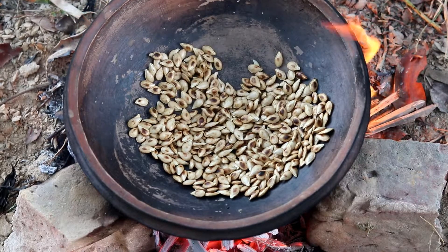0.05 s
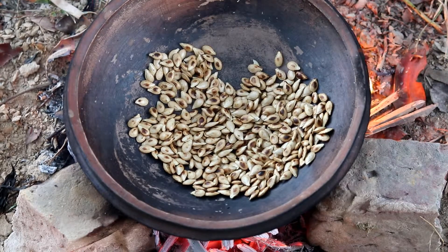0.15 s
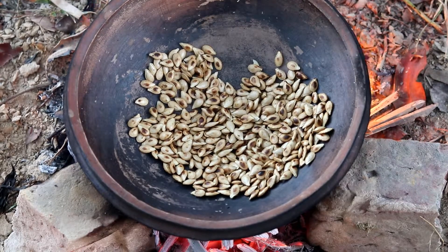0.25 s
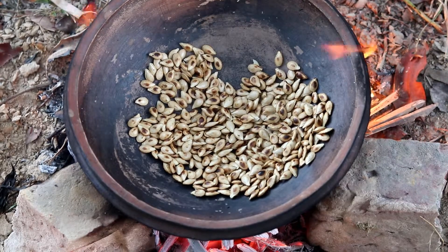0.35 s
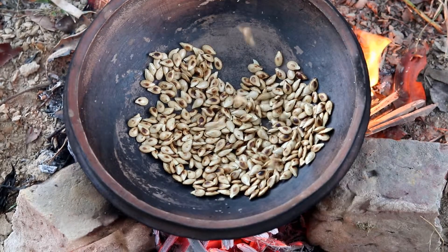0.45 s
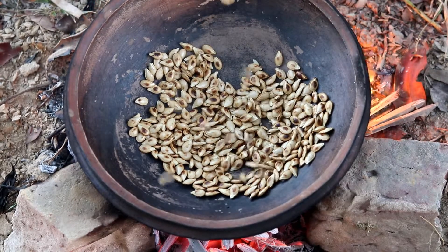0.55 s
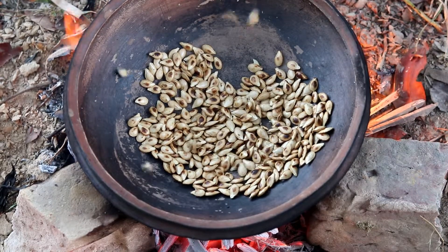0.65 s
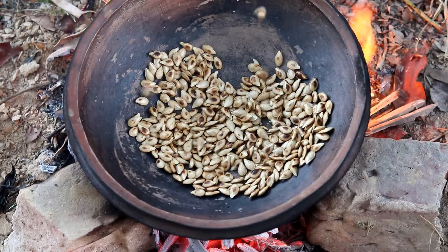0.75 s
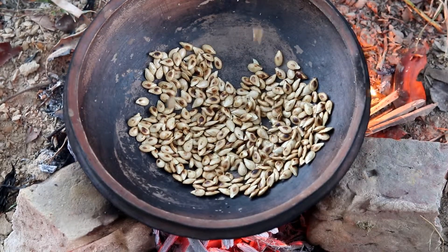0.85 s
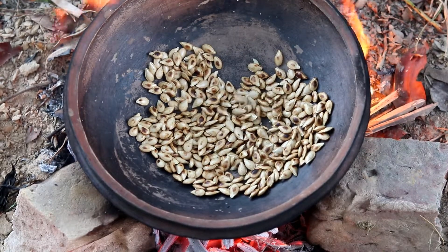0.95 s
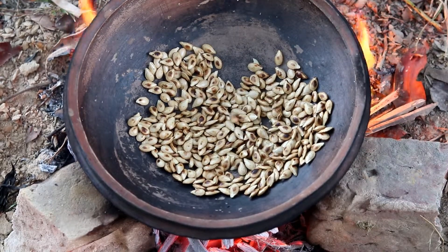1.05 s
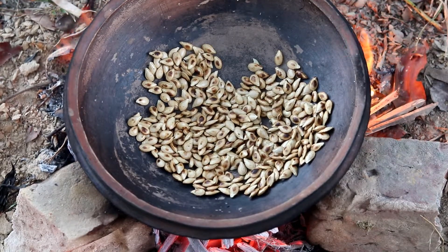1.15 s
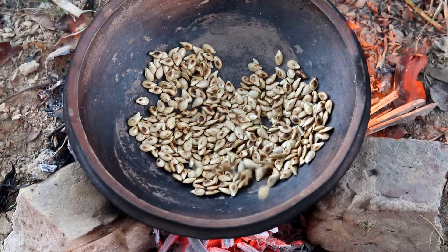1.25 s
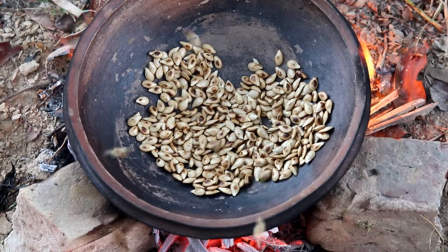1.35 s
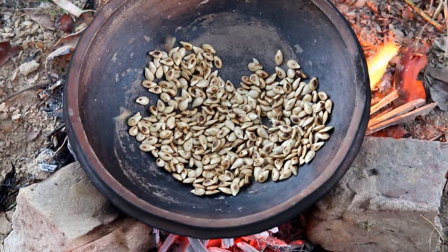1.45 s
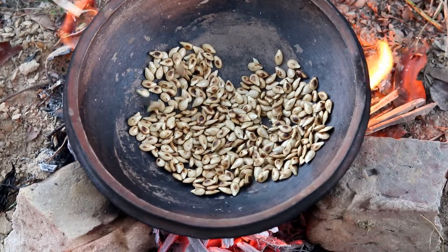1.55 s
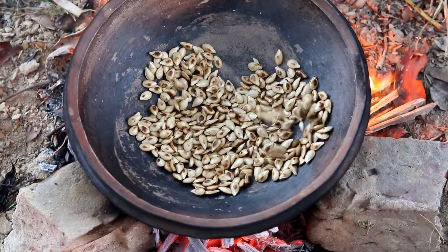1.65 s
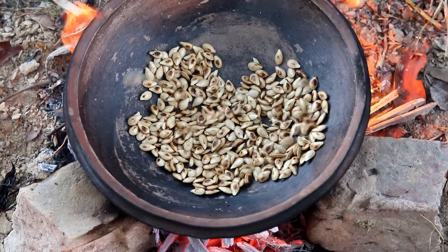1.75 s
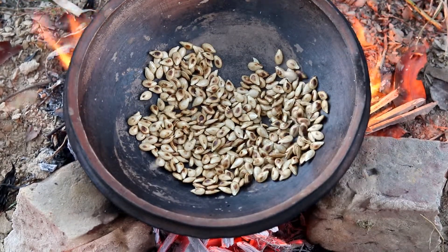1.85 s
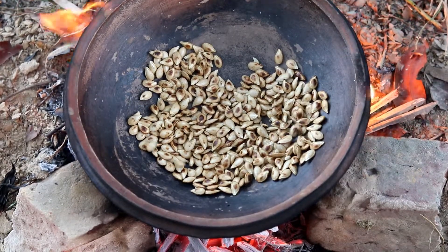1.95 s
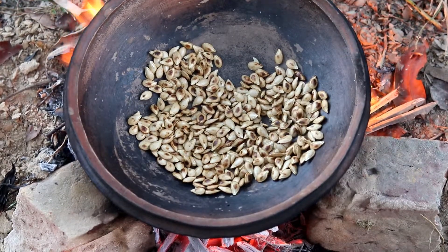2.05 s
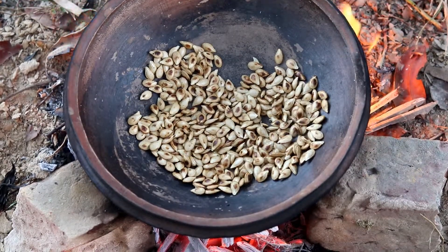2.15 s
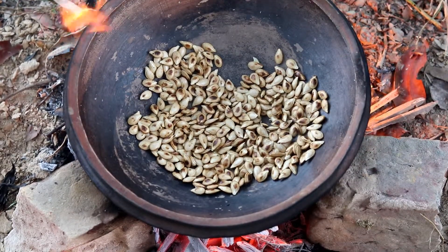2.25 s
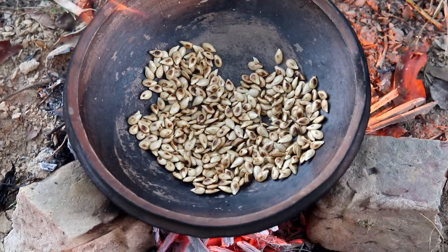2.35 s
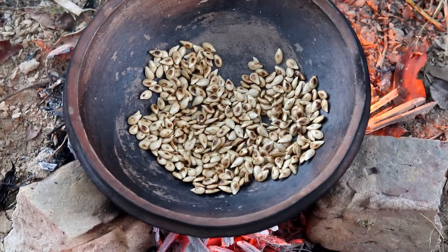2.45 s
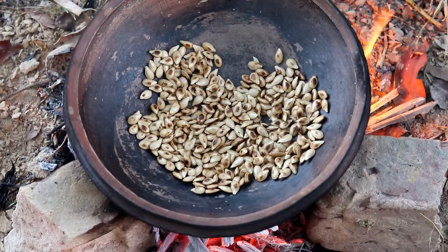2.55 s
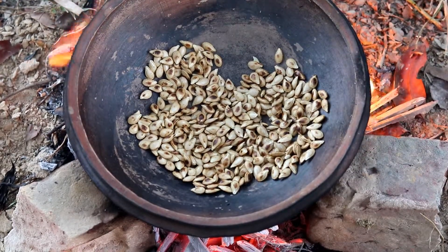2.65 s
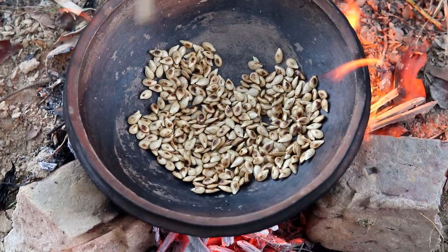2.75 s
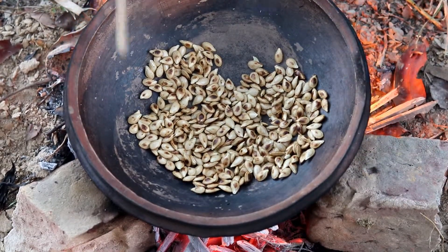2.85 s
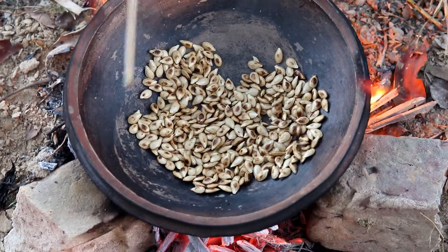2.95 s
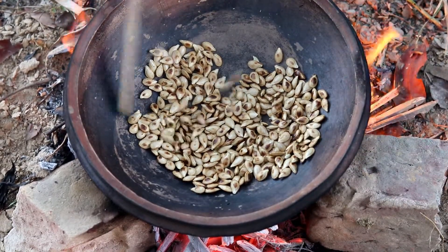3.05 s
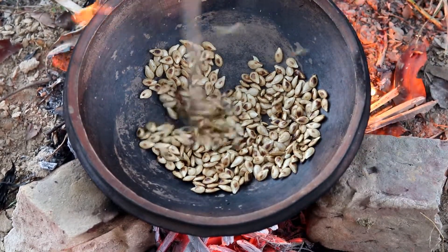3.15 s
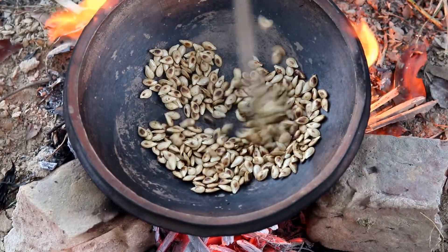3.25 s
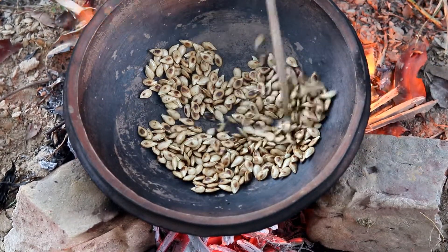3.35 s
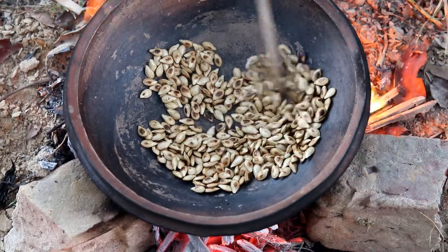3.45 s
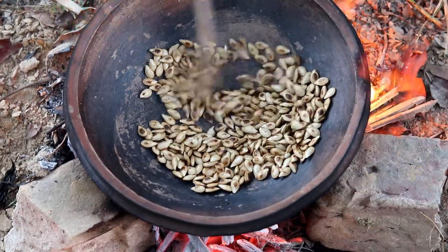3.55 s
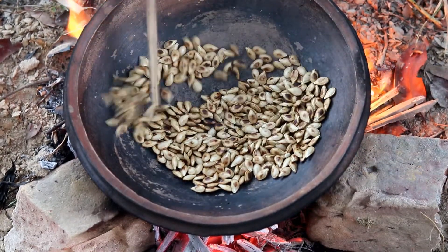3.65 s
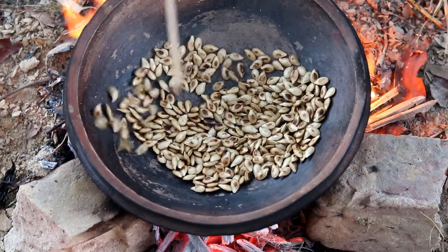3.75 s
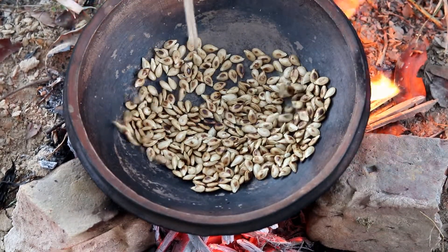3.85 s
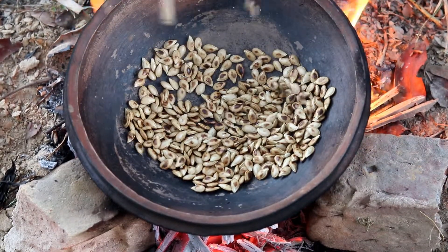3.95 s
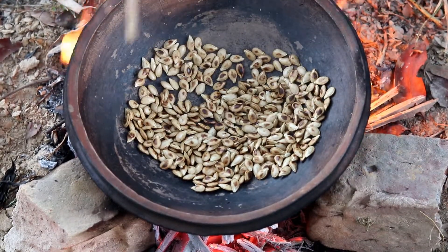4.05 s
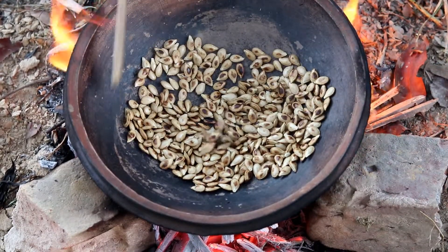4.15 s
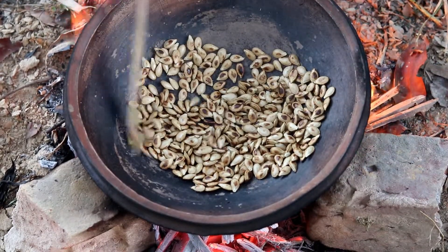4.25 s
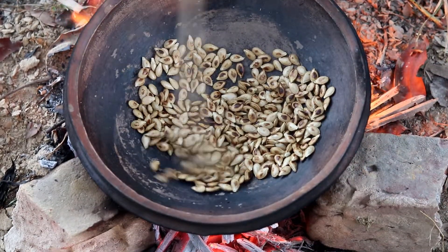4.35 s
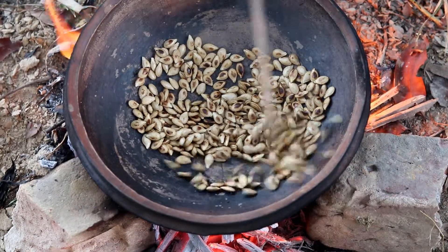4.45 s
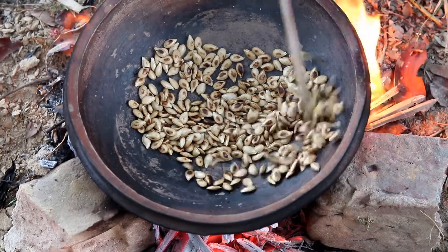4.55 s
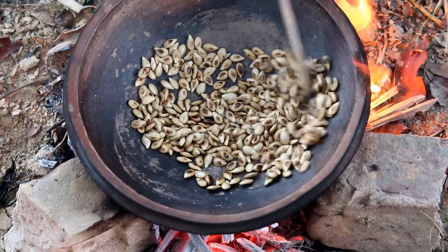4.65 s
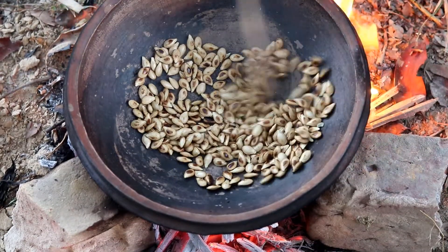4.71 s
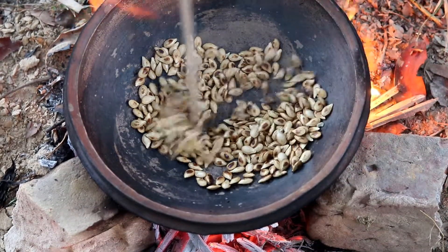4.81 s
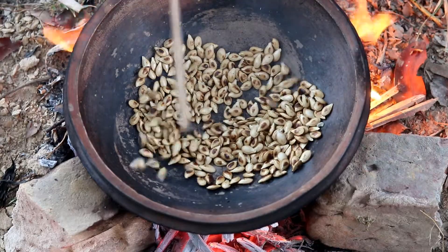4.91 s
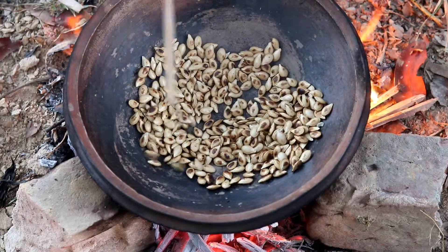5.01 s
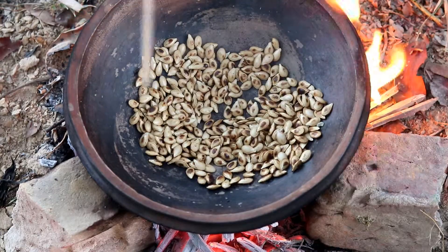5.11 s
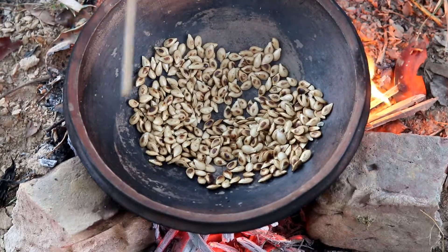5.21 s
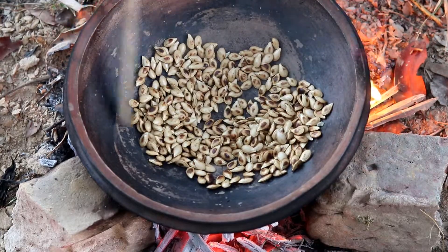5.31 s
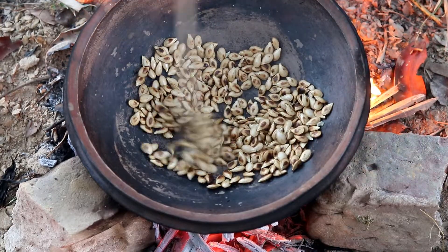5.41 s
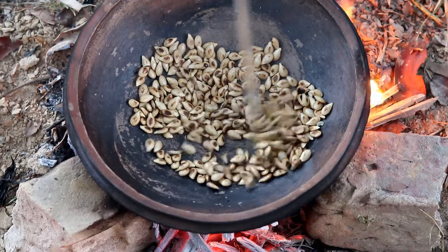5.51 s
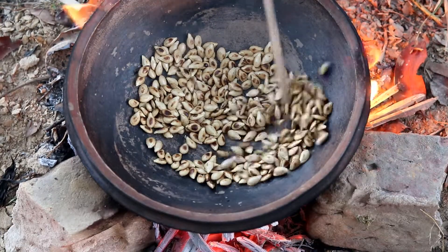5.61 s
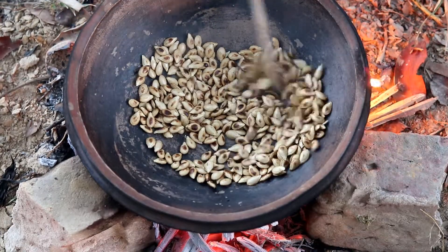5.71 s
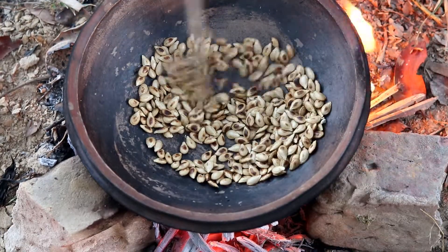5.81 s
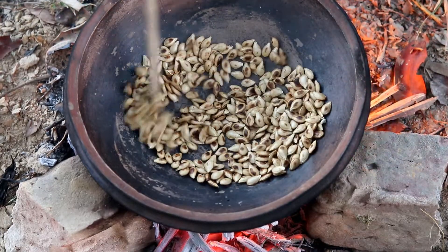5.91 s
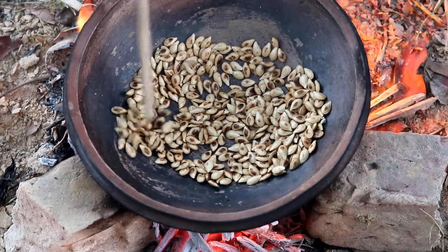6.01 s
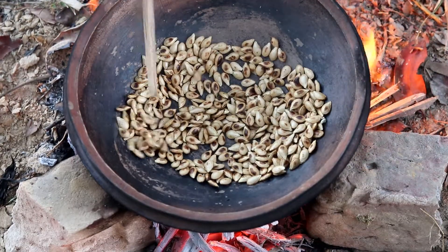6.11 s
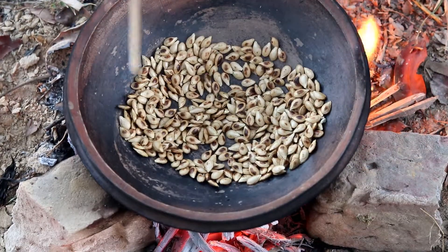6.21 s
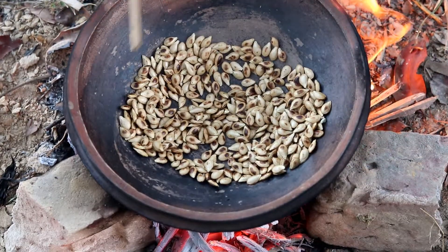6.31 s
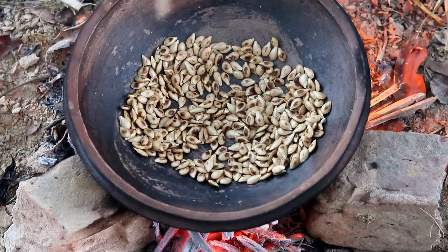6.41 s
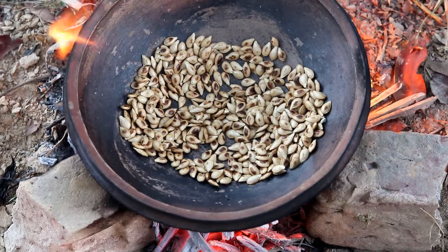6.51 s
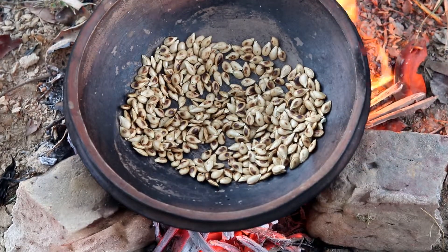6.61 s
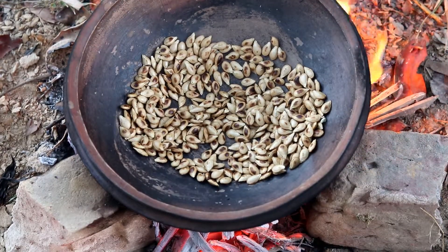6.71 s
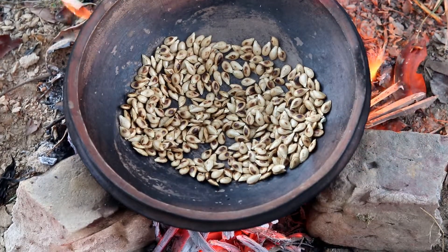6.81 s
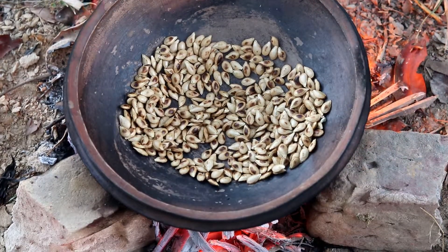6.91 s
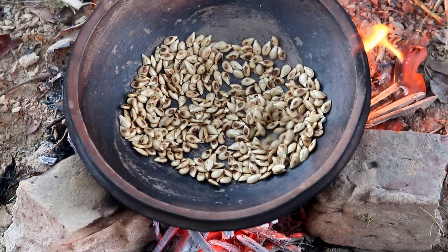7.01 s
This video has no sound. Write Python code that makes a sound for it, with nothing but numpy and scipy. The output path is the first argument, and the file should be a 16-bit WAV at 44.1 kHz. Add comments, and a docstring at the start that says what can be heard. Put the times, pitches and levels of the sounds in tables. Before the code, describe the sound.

Close over a clay pan outdoors, several seeds crack open loudly, some with a puff of steam on the microphone, and their neighbours rattle and settle. More pops follow, two with brief squeaks, as a stick begins stirring with soft dry rustles, knocks and scrapes. The stirring stops, and a short hiss leads into a final pop. A quiet sizzle and a faint, distant engine continue underneath.

```python
"""At a wood fire, a stereo microphone close over a clay pan of roasting seeds. Steam bursts single seeds,
some with a puff on the microphone or a short whistle through the split husk. The moist heap sizzles;
a stick stirs it, taps and scrapes the clay. Far off, a small one-cylinder engine chugs at a steady pace.
The recorder's gain control ducks after each loud burst."""
import sys
import numpy as np
from scipy import signal
from scipy.fft import rfft, irfft, next_fast_len
from scipy.io import wavfile
from scipy.ndimage import map_coordinates

SR = 44100
rng = np.random.default_rng(int(sys.argv[2]) if len(sys.argv) > 2 else 0)


def master_out(mix):
    """Clip the mix to full scale and print it as 16-bit PCM to the path in sys.argv[1]."""
    frames = np.transpose(np.atleast_2d(mix))
    ceiling = np.clip(frames, -1, 1)
    pcm = np.round(ceiling * 32767).astype(np.int16)
    wavfile.write(sys.argv[1], SR, pcm)


N = 311787

# Bursting seeds. Each row: start in seconds, level, bass, treble and left over right in dB, jet length
# in ms, scatter against the jet in dB, hollow and husk pitch in Hz, ring in dB, settling seeds in dB.
BURSTS = [(0.4125, -19.5, 8.5, 0.5, -3.5, 1, -52, 605, 9080, -4, -49.5),
          (0.5171, -19.5, 1.5, 7, -1.5, 2.06, -37.5, 2200, 4530, -3, -70),
          (0.9172, -29, 14, 7, 0, 2.4, -48, 590, 7480, -1, -60),
          (1.263, -22, 2, 11, -1, 1.9, -28.5, 2200, 4370, 4, -61),
          (1.6688, -28.5, -14.5, 4, 0, 3.9, -27.5, 676, 9030, 13.5, -65.5),
          (1.921, -46, 3, 3, 1.5, 2, -42, 2300, 5380, 1, -77),
          (2.946, -40, -10.5, 3, -5.5, 1.9, -25.5, 781, 9850, 7, -64),
          (3.0305, -20.5, -8, 7.5, 3.5, 2.7, -26.5, 2170, 7560, -5, -58),
          (3.0372, -23.5, -18, 9.5, -17, 2, -31, 2260, 4320, 0, -69),
          (3.8754, -21, -14.5, 0.5, -4, 1.2, -30, 1960, 4110, 2.5, -64),
          (4.1774, -40, -20, 16, -6, 6.1, -33, 2010, 4360, 27, -64.5),
          (7.0233, -25, 2, 5, 0.5, 3.7, -24, 2040, 5510, -1, -57)]
# Spectrum of a cracking husk. Each row: frequency in Hz, level in dB.
HUSK_SPECTRUM = [(200, -22), (700, -2.5), (1100, -8.5), (2000, -3.5), (3000, -6), (4200, -6), (6000, -9.5),
                 (9000, -13.5), (11000, -10)]
# Resonances of the clay pan. Each row: frequency in Hz, width in Hz, level in dB.
CLAY_MODES = [(747, 310, 0), (1352, 137, 3.5), (1640, 155, 2.5), (2220, 220, -1), (2740, 224, 0)]


def amp(db):
    return 10 ** (np.asarray(db) / 20)


def unit(x):
    return x / np.sqrt(np.mean(x ** 2) + 1e-20)


def spectrum(points):
    """A response through (Hz, dB) points on a log frequency axis."""
    freqs, db = np.transpose(points)
    return lambda hz: amp(np.interp(np.log(hz + 1), np.log(freqs + 1), db))


def curve(points):
    """One value per sample through (seconds, value) points."""
    return np.interp(np.arange(N) / SR, *np.transpose(points))


def filtered(x, response):
    """Filter x by a complex response of frequency."""
    size = next_fast_len(x.shape[-1] + 8192)
    return irfft(rfft(x, size) * response(np.fft.rfftfreq(size, 1 / SR)), size)[..., :x.shape[-1]]


def modes(table):
    """The causal response of resonances given as (Hz, width in Hz, dB)."""
    return lambda f: sum((-1) ** k * amp(db) * 1j * f * width / (hz * hz - f * f + 1j * f * width)
                         for k, (hz, width, db) in enumerate(table))


def steep_modes(table, power):
    """Resonances with deeper valleys between them."""
    response = modes(table)
    return lambda hz: response(hz) * np.abs(response(hz)) ** power


def wobble(rate):
    """A smooth random curve, rate knots a second."""
    return map_coordinates(rng.standard_normal(int(N * rate / SR) + 4), [np.arange(N) * rate / SR])


def stereo_noise(count, alike, grain_db=0.):
    """Left and right noise, alike in part; grain makes single samples stand out."""
    a, b = rng.standard_normal((2, count)) * amp(grain_db * rng.exponential(size=count))
    turn = np.arccos(np.clip(alike, -1, 1)) / 2
    return np.array([np.cos(turn) * a + np.sin(turn) * b, np.cos(turn) * a - np.sin(turn) * b])


def envelope(t, hold_ms, t60_ms, rise_ms):
    """Rises, holds, then dies away."""
    return (1 - np.exp(-1000 * t / rise_ms)) ** 2 * amp(-60 * np.maximum(1000 * t - hold_ms, 0) / t60_ms)


def swells(start, end, db, rise, fall):
    """Gain of events held from start to end; rise and fall are in dB a second, and powers add."""
    t = np.arange(0, N, 32)[:, None] / SR
    power = amp(db - rise * np.maximum(start - t, 0) - fall * np.maximum(t - end, 0)) ** 2
    return np.interp(np.arange(N) / SR, t[:, 0], np.sqrt(power.sum(axis=1)))


def add(track, start, sound, pan_db=0):
    """Mix a sound in at start seconds, pan_db louder on the left."""
    part = track[:, round(start * SR):][:, :sound.shape[-1]]
    part += (sound * amp([[pan_db / 2], [-pan_db / 2]]))[:, :part.shape[1]]


def seed_bursts():
    """A jet of steam tears the husk; neighbours scatter over the pan for a moment."""
    out, t = np.zeros((2, N)), np.arange(SR // 6) / SR
    for start, db, bass_db, treble_db, pan_db, jet_ms, scatter_db, hollow_hz, husk_hz, ring_db, _ in BURSTS:
        tilt = spectrum([(900, bass_db), (1800, 0), (4000, 0), (6000, treble_db)])
        resonance = modes([(hollow_hz, 350, ring_db), (husk_hz, 600, ring_db)])
        colour = lambda hz: spectrum(HUSK_SPECTRUM)(hz) * tilt(hz) * (1 + np.abs(resonance(hz)))
        shape = envelope(t, jet_ms, t60_ms=18, rise_ms=0.18)
        jet = unit(filtered(stereo_noise(len(t), 0.33), colour) * shape) * np.sqrt(np.mean(shape ** 2))
        # The first crack sets hollow and husk ringing.
        ring = np.sin(2 * np.pi * np.outer([hollow_hz, husk_hz], t)).sum(axis=0)
        ring *= 0.61 * amp(ring_db) / (1 + amp(ring_db)) * envelope(t, 2.2, t60_ms=18, rise_ms=0.52)
        scatter = unit(filtered(stereo_noise(len(t), 0.59, grain_db=2), colour))
        scatter *= amp(scatter_db) * envelope(t, 28, t60_ms=150, rise_ms=1.2)
        add(out, start, amp(db) * (jet + ring + scatter), pan_db)
    return out


def steam_puffs():
    """Steam hits the microphone ports; each pressure swing is slower than the last."""
    # Each row: start in seconds, level in dB, first swing in ms, swing exponent, 60 dB decay in ms,
    # left over right in dB.
    puffs = [(0.4131, -16, 1.08, 0.43, 42, -5), (.9183, -18.5, 1.84, 0.58, 13.7, 7.5),
             (3.0305, -29, 1.77, 0.63, 32, -6), (7.0243, -26, 0.86, 0.4, 47, -10.5)]
    out, t = np.zeros((2, N)), np.arange(SR // 6) / SR
    for start, db, swing_ms, exponent, t60_ms, pan_db in puffs:
        push = np.sin(np.pi * (1000 * t / swing_ms) ** exponent)
        add(out, start, amp(db) * push * envelope(t, 2.42, t60_ms, rise_ms=0.52), pan_db)
    return out


def husk_whistles():
    """Steam whistles through a split husk, sags in pitch as the pressure falls and dies breathily."""
    # Each row: start in seconds, pitch in Hz, level in dB, hold and 60 dB decay in ms,
    # then breathy tail and harmonics 2 to 4 in dB against the fundamental.
    whistles = [(3.8757, 1971, -25, 4.4, 35, -25.5, 2.5, -2.5, -3),
                (4.178, 2023, -20.5, 5.07, 7.5, -31.5, -11.5, -9.5, -11)]
    out, t = np.zeros((2, N)), np.arange(SR // 6) / SR
    for start, hz, db, hold_ms, t60_ms, tail_db, *overtones_db in whistles:
        phase = 2 * np.pi * hz * (t - .7 * t ** 2) + [[.2], [-.2]]
        harmonics = list(enumerate([0, *overtones_db]))
        for k, level_db in harmonics:
            shape = envelope(t, hold_ms, t60_ms / (1 + 0.17 * k), rise_ms=0.24)  # high ones die sooner
            add(out, start, amp(db + level_db) * np.sin((k + 1) * phase - 0.41 * k) * shape)
        bands = [((k + 1) * hz, 110 + 50 * k, level_db) for k, level_db in harmonics]
        breath = unit(filtered(stereo_noise(len(t), 0.44), steep_modes(bands, 0.32)))
        add(out, start, amp(db + tail_db) * breath * envelope(t, 13, t60_ms=270, rise_ms=2.8))
    return out


def pan_taps():
    """Seeds and stick tumble on the pan: a dry rattle plus the hollow ring of the clay."""
    # Each row: start in seconds, rattle, knock and left over right in dB, 60 dB decay in ms.
    taps = [(0.617, -55.5, -58.5, 0, 110), (0.6973, -53.5, -65.5, -2, 49), (0.768, -61, -64, -1, 72),
            (1.4367, -53, -79, -4, 54), (1.4532, -57.5, -75, -4, 27), (2.1322, -63, -89.5, 5, 120),
            (3.2184, -51.5, -69, -1, 90), (3.4292, -63, -91, -5, 140), (3.548, -59.5, -67, -2, 540),
            (3.7184, -60.5, -72, -4, 72), (4.2862, -65.5, -55.5, 1, 80), (4.3733, -68.5, -55.5, 1, 74),
            (4.4116, -58.5, -71, -2, 260), (4.4377, -63, -53, 1, 67), (4.5221, -56.5, -67, -1.5, 260),
            (4.6232, -56.5, -80, 1, 56), (4.6477, -57, -88, -3, 33), (4.7561, -59.5, -70, 0, 520),
            (4.787, -50, -53.5, 2, 120), (4.914, -53.5, -59, -0.5, 95), (5.3499, -58.5, -46, -0.5, 21),
            (5.396, -75, -50, 3, 47), (5.474, -69, -52.5, 0, 73), (5.5074, -59.5, -54, 0, 66),
            (5.5997, -62.5, -57.5, 1, 42), (5.672, -57, -77, -3, 57), (5.8634, -66, -44.5, 0, 34),
            (5.9203, -55.5, -49.5, 2, 34)]
    out, t = np.zeros((2, N)), np.arange(SR // 6) / SR
    husk_treble = lambda hz: spectrum(HUSK_SPECTRUM)(hz) * (hz > 1500)
    for start, rattle_db, knock_db, pan_db, t60_ms in taps:
        rattle = amp(rattle_db) * unit(filtered(stereo_noise(len(t), 0.77, grain_db=2), husk_treble))
        knock = amp(knock_db) * unit(filtered(stereo_noise(len(t), .9), steep_modes(CLAY_MODES, .45)))
        add(out, start, (rattle + knock) * envelope(t, 4.6, t60_ms, rise_ms=0.085), pan_db)
    return out


def seed_ticks(count, low_hz, high_hz, t60_ms, spread_db):
    """Many small contacts, each ringing briefly at its own pitch somewhere in the pan."""
    onset, pitch, offset, place = rng.uniform(size=(4, count, 1))
    age = np.arange(320)  # samples
    size = amp(spread_db * rng.exponential(size=(count, 1)))
    phase = 2 * np.pi * ((low_hz + pitch * (high_hz - low_hz)) * age / SR + offset)
    fade = size * amp(-60000 * age / SR / t60_ms) * np.minimum(age / 20, 1)
    where = ((onset * N).astype(int) + age).ravel()
    sides = [np.sin(phase) * fade, np.sin(phase + 2.14 * (2 * place - 1)) * fade]
    return unit(np.array([np.bincount(where, side.ravel())[:N] for side in sides]))


def seed_heap():
    """Moisture sizzles; seeds rustle at rest, when stirred, and as they land after a burst."""
    # Tone of the sizzle and of the rustle. Each row: frequency in Hz, level in dB.
    sizzle_tone = [(410, -59), (700, -8), (1300, -14), (1990, -6), (2180, -8.5), (2440, -2.5),
                   (3690, -14.5), (5000, -23), (6500, -38), (11000, -120)]
    rustle_tone = [(1650, -24), (2800, -6.5), (3160, -8.5), (4250, -3.5), (9980, -9.5), (10500, -20),
                   (11000, -46), (14300, -75), (22000, -120)]
    # Sizzle and rustle of the heap left alone. Each row: time in seconds, level in dB.
    resting_sizzle = [(0, -64), (.5, -63.5), (.9, -65.5), (1.28, -61.5), (1.8, -67), (2.75, -66.5),
                      (3.05, -64.5), (5.2, -67), (6.3, -64.5), (7.07, -60.5)]
    resting_rustle = [(0, -75.5), (.9, -74), (2.1, -70.5), (2.6, -76), (4.1, -74), (6.0, -77), (6.3, -77),
                      (7.07, -74.5)]
    # The stick pushes through the heap. Each row: start and end in seconds, rustle and sizzle in dB.
    stirs = [(3.1, 3.3, -74, -73), (3.52, 3.78, -72, -74), (4.306, 5.013, -70, -69),
             (5.44, 5.697, -68, -65.5), (5.767, 5.99, -65.5, -58)]
    start, end, rustle_db, sizzle_db = np.transpose(stirs)
    burst_s, *_, settle_db = np.transpose(BURSTS)
    landing_s = burst_s + 0.014
    thrown = swells(landing_s, landing_s, settle_db, rise=600, fall=83.5)
    stirred = swells(start, end, rustle_db, rise=119, fall=119)
    rustle_gain = np.sqrt(amp(curve(resting_rustle)) ** 2 + thrown ** 2 + stirred ** 2)
    sizzle_gain = np.hypot(amp(curve(resting_sizzle)), swells(start, end, sizzle_db, rise=119, fall=119))
    flicker = wobble(13)
    ticks = seed_ticks(count=12000, low_hz=686, high_hz=10590, t60_ms=22, spread_db=1.5)
    sizzle = unit(filtered(0.5 * ticks + stereo_noise(N, 0.12), spectrum(sizzle_tone)))
    grains = 0.82 * ticks[::-1, ::-1] + stereo_noise(N, 0.032, grain_db=2)
    rustle = unit(filtered(grains, spectrum(rustle_tone)))
    return sizzle_gain * amp(1.1 * flicker) * sizzle + rustle_gain * amp(1.6 * flicker) * rustle


def steam_leaks():
    """A husk about to burst leaks a swelling hiss."""
    # Each row: start and end in seconds, centre and width in Hz, final level in dB.
    leaks = [(1.167, 1.27, 4200, 350, -59), (2.957, 3.032, 2310, 700, -53.5), (6.96, 7.033, 2170, 600, -49)]
    out = np.zeros((2, N))
    for start, end, hz, width_hz, db in leaks:
        swell = np.linspace(0, 1, round((end - start) * SR)) ** 1.6
        hiss = unit(filtered(stereo_noise(len(swell), 0.54), steep_modes([(hz, width_hz, 0)], 0.17)))
        add(out, start, amp(db) * swell * hiss)
    return out


def stick_scrapes():
    """The stick drags over the clay in uneven slips, waking different modes from rim to middle."""
    # Each row: start and length in seconds, then the first, second, third and highest modes in dB.
    scrapes = [(3.154, 0.084, -72, -62, -74, -74), (3.183, 0.058, -59, -78, -79.5, -72),
               (3.3, 0.087, -85, -67.5, -80, -80), (3.536, .2, -83, -73.5, -72, -68),
               (3.807, 0.074, -85, -72, -70, -69), (4.316, 0.03, -65, -60, -72, -81),
               (4.382, .04, -58.5, -61, -77, -78), (4.425, 0.019, -57.5, -56, -68, -78),
               (4.774, 0.039, -77, -55.5, -62, -62), (4.828, 0.043, -61, -62, -70, -68),
               (4.94, 0.052, -71, -81, -87, -83), (5.358, 0.026, -67, -68, -60, -67),
               (5.392, 0.06, -68.5, -57, -74, -82), (5.45, .02, -56.5, -66, -72, -78),
               (5.483, 0.026, -52.5, -57, -50.5, -72), (5.525, 0.053, -63, -66.5, -68, -64),
               (5.597, 0.1, -78, -75, -76, -69), (5.853, 0.018, -76, -58, -77, -74),
               (5.912, .06, -62, -60, -67, -61)]
    start, length, *levels_db = np.transpose(scrapes)
    slips = stereo_noise(N, 0.91, grain_db=3.3) * amp(2.5 * wobble(90))
    groups = CLAY_MODES[:1], CLAY_MODES[1:2], CLAY_MODES[2:3], CLAY_MODES[3:]
    out = np.zeros((2, N))
    for db, group in zip(levels_db, groups):
        clay = unit(filtered(slips, steep_modes(group, .45)))
        out += swells(start, start + length, db, rise=700, fall=400) * clay
    return out


def engine_strokes(pattern, scatter_db, jitter_ms, firing_hz=15.355):
    """One pulse per listed stroke and cycle; every other cycle is a little stronger."""
    part, db = np.transpose(pattern)
    cycle = np.arange(int(N / SR * firing_hz) + 1)[:, None]
    timing, strength = rng.standard_normal((2, len(cycle), len(part)))
    onset = ((cycle + part) / firing_hz + timing * jitter_ms / 1000) * SR
    size = amp(db + scatter_db * strength + 0.5 * (-1.) ** cycle)
    return np.bincount(np.abs(onset).astype(int).ravel(), size.ravel(), N + SR)[:N]


def distant_engine():
    """Knocks ring the casing, exhaust pulses ring the pipe and boom; distance blurs them with noise."""
    # How strongly the engine carries to the microphone. Each row: time in seconds, exhaust level in dB.
    carry = [(0, -66.5), (.35, -64), (.5, -72), (.63, -65), (.85, -66), (.96, -74), (1.34, -73),
             (1.67, -81), (2.09, -78), (2.56, -73), (3.23, -71), (3.56, -80.5), (3.86, -80.5), (4.04, -73),
             (4.51, -75), (5.04, -70.5), (6.14, -65.5), (7.07, -62.5)]
    # Knocks and exhaust pulses. Each row: position as a fraction of the cycle, level in dB.
    knocks = [(.345, 0), (.77, -5), (.96, -7), (.14, -11), (.57, -13)]
    exhaust_pulses = [(0.33, 0), (0.41, -5), (0.061, -4), (0.83, -7)]
    # Resonances of casing and pipe. Each row: frequency and width in Hz, level in dB.
    casing_modes = [(415, 38.4, -1.5), (522.4, 86.6, -2), (728, 20, -12), (335, 120, -9)]
    pipe_modes = [(197, 58, 16.5), (247, 150, -20), (140, 40, -1)]
    # The low boom of the exhaust. Each row: frequency in Hz, level in dB.
    boom_tone = [(20, -26), (35, -13.5), (60, -17), (88, -2), (130, -5), (200, -22), (400, -66.5)]

    def blur(pulses, share, alike):
        return np.sqrt(1 - share) * unit(pulses) + np.sqrt(share) * stereo_noise(N, alike)

    exhaust = engine_strokes(exhaust_pulses, scatter_db=1, jitter_ms=0.12)
    knocking = engine_strokes(knocks, scatter_db=2, jitter_ms=0.1)
    casing = unit(filtered(blur(knocking, share=.28, alike=.9), steep_modes(casing_modes, .5)))
    pipe = unit(filtered(blur(exhaust, share=.18, alike=.85), steep_modes(pipe_modes, .6)))
    boom = unit(filtered(blur(exhaust, share=.87, alike=1), spectrum(boom_tone)))
    pipe_db = curve(carry)
    swing_db = pipe_db + 72  # the lower the sound, the wider its level swings
    mix = amp(-66 + 0.54 * swing_db) * casing + amp(pipe_db) * pipe + amp(-78 + 1.86 * swing_db) * boom
    return mix * amp([[.6], [-.6]])  # slightly left


def scene():
    """The pan close up, the engine far behind."""
    popping = seed_bursts() + steam_puffs() + husk_whistles()
    return popping + pan_taps() + seed_heap() + steam_leaks() + stick_scrapes() + distant_engine()


def record(dry):
    """The recorder ducks with the smoothed power, squashes peaks, cuts the top and adds faint hiss."""
    smoothing_s, knee_db, ceiling, top_hz = 0.036, -47.5, .115, 10450
    pole = np.exp(-1 / (smoothing_s * SR))
    power = signal.lfilter([(1 - pole) ** 2], [1, -2 * pole, pole ** 2], np.mean(dry ** 2, axis=0))
    ducked = dry * (1 + np.abs(power) / amp(knee_db) ** 2) ** -.3
    squashed = ducked / (1 + np.abs(ducked / ceiling) ** 5) ** (1 / 5)
    lowpass = lambda hz: 1 / (1 + (hz / top_hz) ** 110)
    spill = lambda hz: amp(-42 - 6 * np.abs(hz - top_hz) / 1000) * (hz > top_hz)
    hiss = amp(-103) * rng.standard_normal(dry.shape)
    return filtered(squashed, lambda hz: lowpass(hz) + spill(hz)) + hiss


dry = scene()
out = record(dry)
master_out(out)
```